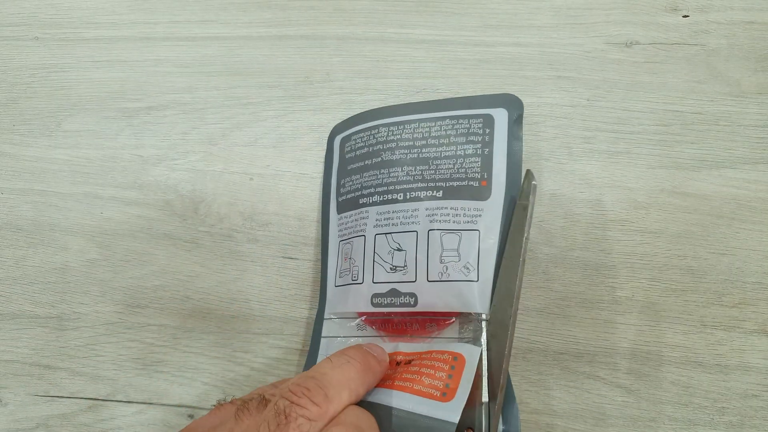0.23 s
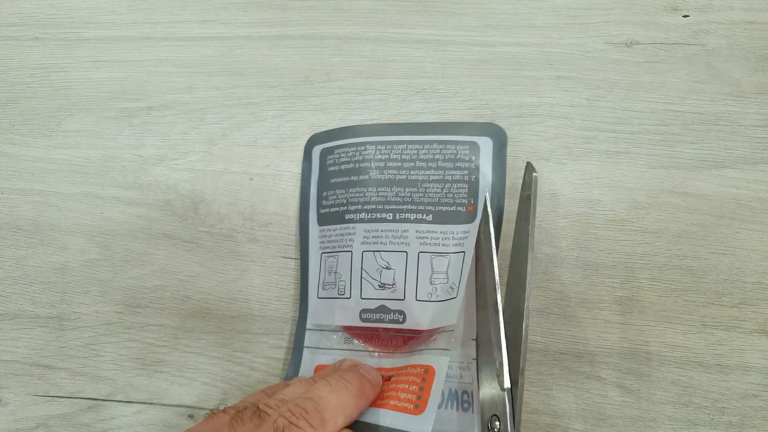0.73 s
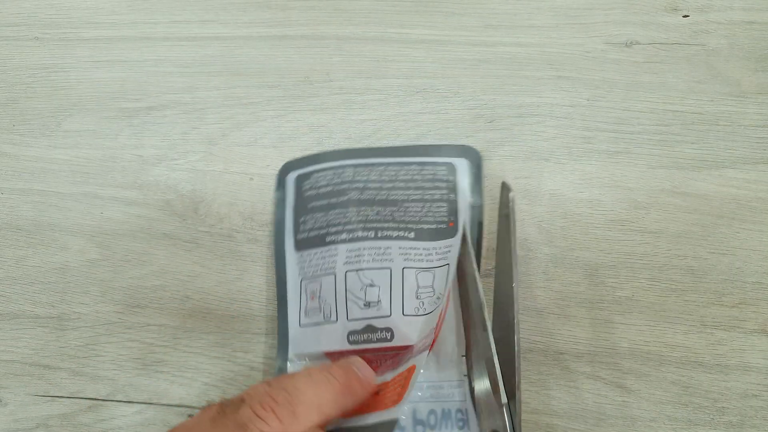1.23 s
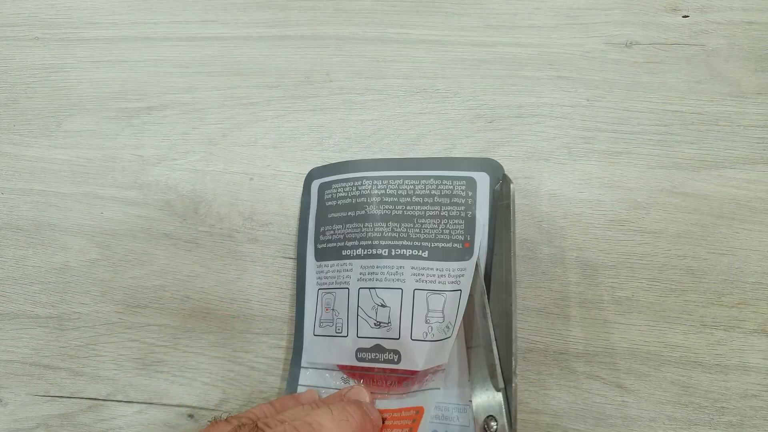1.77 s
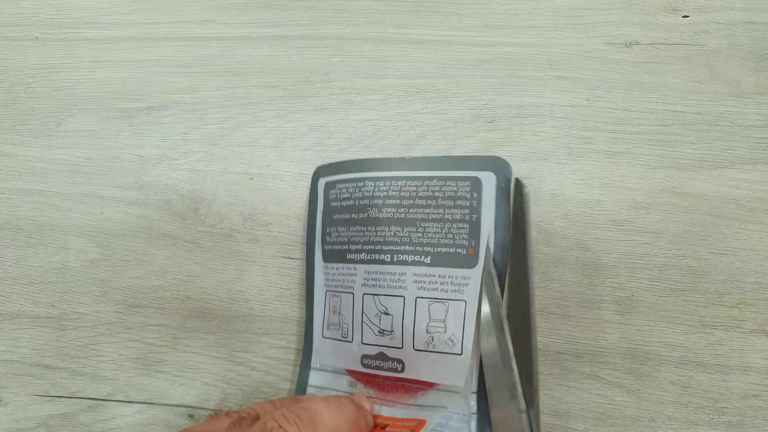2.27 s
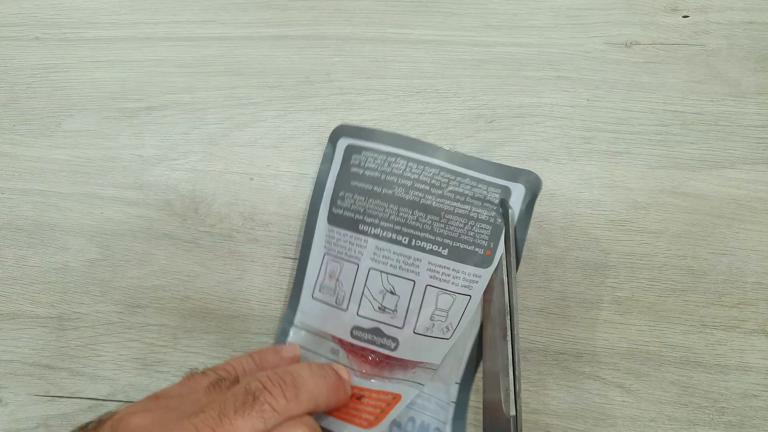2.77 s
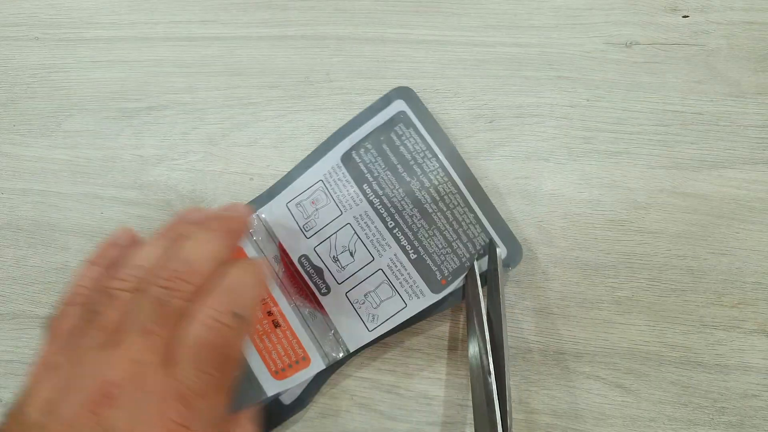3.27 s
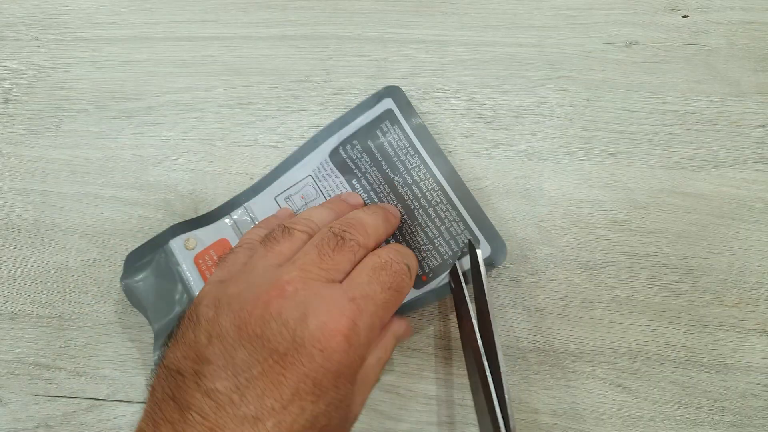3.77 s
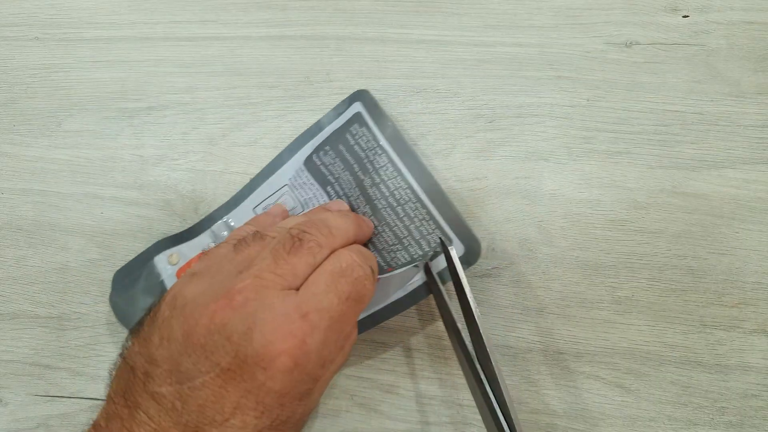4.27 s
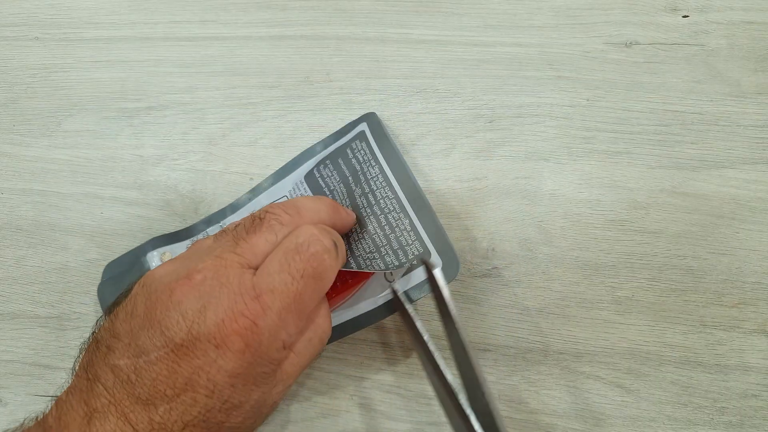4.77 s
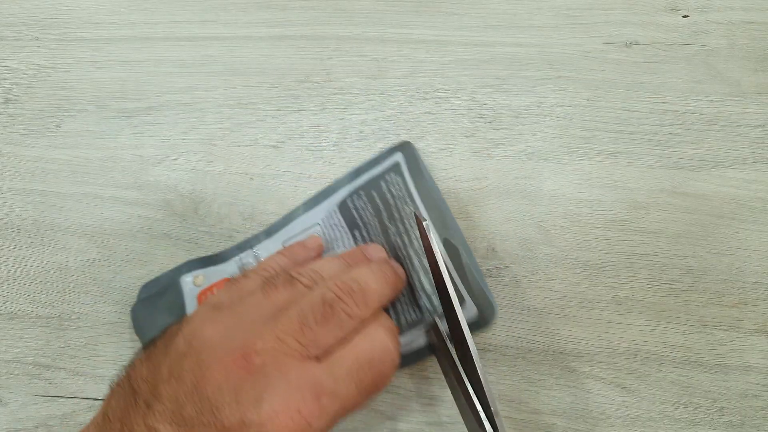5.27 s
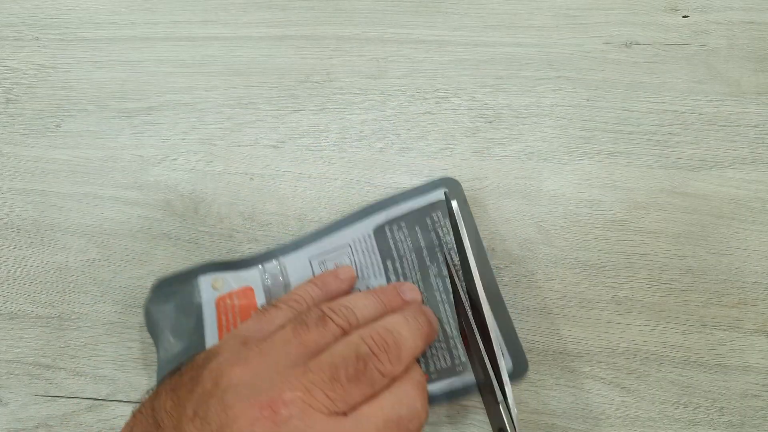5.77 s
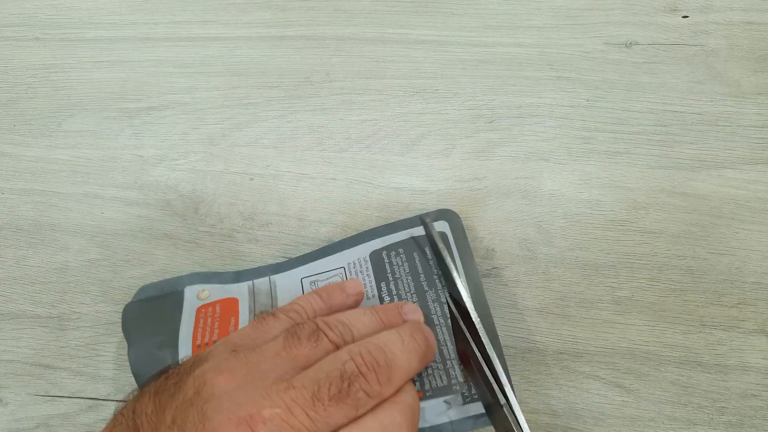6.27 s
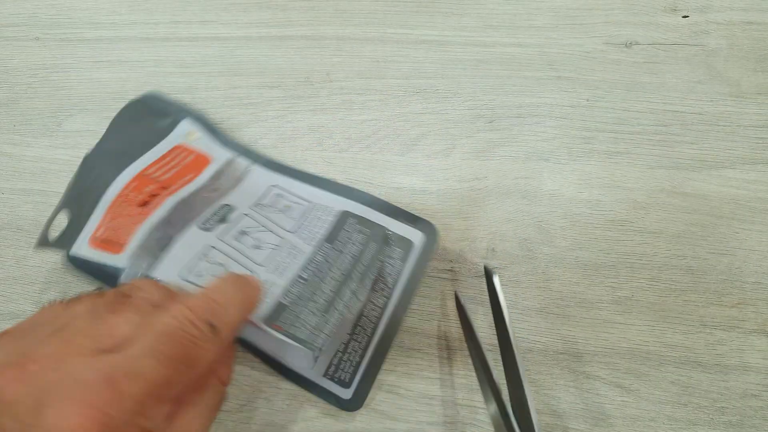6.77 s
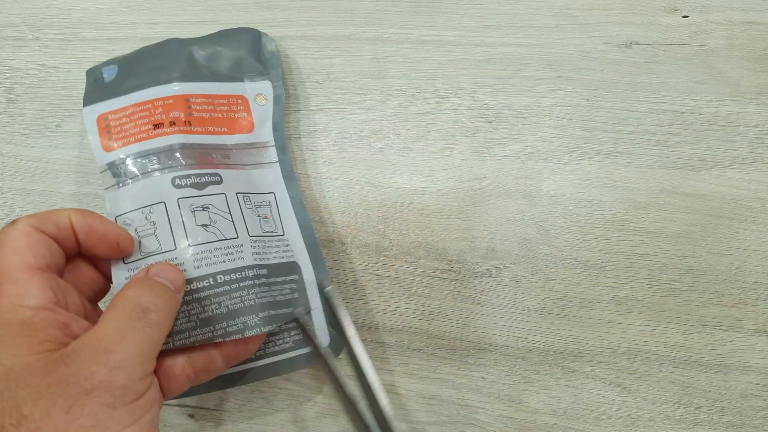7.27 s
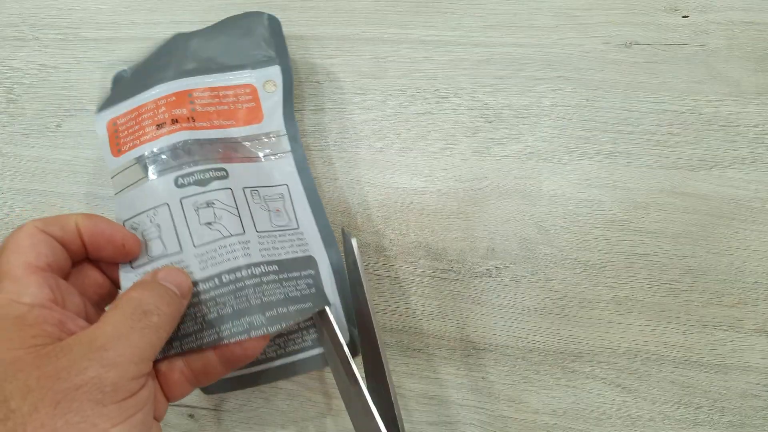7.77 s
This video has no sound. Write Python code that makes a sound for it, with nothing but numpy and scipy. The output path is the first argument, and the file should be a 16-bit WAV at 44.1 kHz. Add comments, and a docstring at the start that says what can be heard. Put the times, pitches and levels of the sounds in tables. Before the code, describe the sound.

Heard close in a small quiet room with soft air and a barely audible mains hum. From the start, a tight burst of bright plastic snaps and blade clicks, with rustling film. Around 0.4-0.8 s a crunchy cut swells, with more pops; scattered snaps follow at 1.0-2.4 s, including a brief hollow ring at 1.5. A strong crackling cluster comes at 2.6-2.8. At 3.2 a hard clack on the wooden table, another at 3.7, then softer sliding and faint bumps until about 5. Sharp snaps and a hollow ring at 5.2-5.3; quick rasping bites near 5.7, and knocks around 6. Crinkling and a bright snap at 6.4, a short crunch at 6.5, and immediately the loudest table knock. A tiny thin squeak at 6.8, several woody bumps to 7.1, then rubbing, a knock near 7.75 and renewed crinkling to the end.

```python
"""In a small room, just above a wooden table, scissors snip through a stiff plastic pouch.
Dense runs of tiny clicks make the crunch of the blades; short bursts of ringing noise make the film's snaps.
Pouch and scissors knock on the table: a noise burst for the clack, fading sine tones for the wood.
Filtered random clicks make hand, pouch and blades slide and rub; short tones add hollow rings, a thud, a squeak.
Quiet noise and two sine tones make the room air and a faint mains hum underneath."""
import sys
import numpy as np
from scipy import signal
from scipy.fft import rfft, irfft, next_fast_len
from scipy.io import wavfile
from scipy.ndimage import map_coordinates

SR = 44100
rng = np.random.default_rng(int(sys.argv[2]) if len(sys.argv) > 2 else 0)


def unload_audio(sound):
    """Save the sound as a 16-bit wav file, at the path given as the first command line argument."""
    columns = np.transpose(np.atleast_2d(sound))
    # keep every value between -1 and 1, then stretch to whole-number steps
    steps = np.round(np.clip(columns, -1, 1) * 32767)
    wavfile.write(sys.argv[1], SR, steps.astype(np.int16))


N = 353666  # length of the scene in samples


def amp(db):
    """Turn decibels into a gain."""
    return 10 ** (np.asarray(db) / 20)


def unit(x):
    """Scale to an average (rms) level of 1."""
    return x / np.sqrt(np.mean(x ** 2) + 1e-20)


def along(points, hz):
    """Read a curve of (frequency, value) points on a log frequency axis."""
    point_hz, value = np.transpose(points)
    return np.interp(np.log(hz + 1), np.log(point_hz), value)


def wobble(rate):
    """A smooth random curve through `rate` random values a second."""
    values = rng.standard_normal(int(N * rate / SR) + 4)
    return map_coordinates(values, [np.arange(N) * rate / SR])


def fade(t, t60):
    """A decay of 60 dB in t60 seconds."""
    return np.exp(-np.log(1000) * t / t60)


def filtered(x, response):
    """Multiply the spectrum of x by a response that depends on frequency."""
    length = x.shape[-1]
    padded = next_fast_len(length + SR // 10)
    spectrum = rfft(x, padded) * response(np.fft.rfftfreq(padded, 1 / SR))
    return irfft(spectrum, padded)[..., :length]


def coloured(x, tone):
    """Shape x with the given tone curve, then scale to rms 1."""
    return unit(filtered(x, lambda hz: amp(along(tone, hz))))


def causal(gain):
    """The minimum-phase spectrum with this gain: its energy comes as early as it can."""
    cepstrum = irfft(np.log(np.maximum(gain, 1e-6)))
    half = len(cepstrum) // 2
    cepstrum[1:half] *= 2
    cepstrum[half + 1:] = 0
    return np.exp(rfft(cepstrum))


def add(track, s, sound):
    """Mix a sound into a track at time s."""
    start = max(round(s * SR), 0)
    part = track[..., start:start + sound.shape[-1]]
    part += sound[..., :part.shape[-1]]


def grains(per_s, spread_db):
    """Tiny slips: single-sample clicks at random times, of very unequal size and either sign."""
    size = amp(spread_db * np.minimum(rng.standard_normal(N), 2))
    happens = rng.random(N) < per_s / SR
    return unit(happens * size * rng.choice([-1, 1], N))


def diffuse(pair, spacing_m=0.072, alike=0.61):
    """Two unrelated signals as sound from all sides: the two ports are most alike in the bass."""
    def mid_and_side(hz):
        turn = np.arccos(alike * np.sinc(2 * hz * spacing_m / 343)) / 2  # 343 m/s: speed of sound
        return np.array([np.cos(turn), np.sin(turn)])
    mid, side = filtered(pair, mid_and_side)
    return np.array([mid + side, mid - side])


def direct(x, lead_s):
    """The straight path reaches the left port lead_s sooner than the right."""
    return filtered(x, lambda hz: np.exp(1j * np.pi * hz * lead_s * np.array([[1], [-1]])))


# how long the room's echoes last at each pitch: (frequency [Hz], time to die by 60 dB [s])
ROOM_DECAY = [(120, 0.49), (400, 0.14), (1500, 0.15), (5000, 0.14), (14000, 0.13)]


def heard(x, room_db, lead_s, build_s=0.001, early=1.9, early_t60=0.039):
    """The straight path plus a fresh random scatter of echoes from table and walls."""
    hz, t, bands = signal.stft(rng.standard_normal((2, SR // 3)), SR, nperseg=256)
    bands = bands * fade(t, along(ROOM_DECAY, hz)[:, None])
    tail = signal.istft(bands, SR, nperseg=256)[1]
    t = np.arange(tail.shape[1]) / SR
    # table and hands are near, so their echoes come first and strongest
    tail = diffuse(tail) * (1 - np.exp(-t / build_s)) * (1 + early * fade(t, early_t60))
    tail = tail / np.linalg.norm(tail[0])
    echoes = signal.fftconvolve(np.atleast_2d(x), tail, axes=1)[:, :x.shape[-1]]
    return direct(x, lead_s) + amp(room_db) * echoes


def moving(x, room_db, lead_s):
    """A source that moves about meets a new pattern of echoes eight times a second."""
    out, step = np.zeros((2, N)), SR // 8
    for start in range(0, N, step):
        # silence after each piece leaves room for its echoes
        part = np.pad(x[start:start + step], (0, step))
        if np.abs(part).max() > 1e-6:  # skip silent pieces
            add(out, start / SR, heard(part, room_db, lead_s))
    return out


def body(hz):
    """The low band, about 90-680 Hz, that a heavier contact fills."""
    return 1 / (1 + (hz / 680) ** 4) / (1 + (90 / hz) ** 4)


def blow(tone, body_db, treble_db, ring_hz, t60, ring_db, octaves, breadth, size=16384):
    """A brief flutter of the film, ringing round one pitch: a noise burst, different at each port."""
    t, hz = np.arange(size) / SR, np.fft.rfftfreq(size, 1 / SR) + 1
    # a broad sheet does not send quite the same wave to both ports
    shake = rng.standard_normal(size) + breadth * diffuse(rng.standard_normal((2, size)))
    # the flutter, with a much shorter crack on its start
    shake *= fade(t, t60) + 0.092 * fade(t, 0.0026)
    ring = ring_db * np.exp(-.5 * (np.log2(hz / ring_hz) / octaves) ** 2)
    shelves = body_db * body(hz) + treble_db / (1 + (4700 / hz) ** 4)
    # so small a sheet radiates no deep bass
    radiation = 1 / (1 + (90 / hz) ** 3)
    spectrum = rfft(shake) * causal(radiation * amp(along(tone, hz) + ring + shelves))
    # set the level by the middle band: its energy equals rms 1 over 10 ms
    middle = irfft(spectrum * ((hz > 700) & (hz < 4500)))
    return irfft(spectrum) * np.sqrt(2 * SR / 100) / np.linalg.norm(middle)


def stroke(length, attack, release):
    """One movement: its progress from 0 to 1, and a gain that rises, holds and dies away."""
    t = np.arange(SR) / SR
    progress = np.clip(t / length, 0, 1)
    gain = np.clip(t / attack, 0, 1) * fade(np.maximum(t - length, 0), release)
    return progress, gain


# the tones of the mains hum: (frequency [Hz], level [dB])
HUM_TONES = [(58.6, -58.5), (118, -75)]
# tone of the room air: (frequency [Hz], level per Hz [dB])
AIR_TONE = [(20, -13), (55, 4), (100, 6), (200, -5), (2000, -14.5), (6000, -28), (16000, -40)]


def background(air_db=-69):
    """Still room air as soft noise from all sides, and sine tones for a slightly unsteady hum."""
    t = np.arange(N) / SR
    hum = np.zeros(N)
    for hz, db in HUM_TONES:
        hum += amp(db) * unit(np.sin(2 * np.pi * hz * t + 0.66 * wobble(3.1)))
    air = coloured(diffuse(rng.standard_normal((2, N))), AIR_TONE)
    return hum * amp(0.41 * wobble(3)) + amp(air_db) * air


# hand, pouch and scissor blades slide and rub: (time [s], length [s], drag on the table [dB],
# film rustle [dB], skin and blade hiss [dB])
RUBS = [(0.0, 0.19, -57, -61, -72), (0.278, 0.17, -66, -68.5, -89), (0.41, 0.37, -53.5, -55, -60.5),
        (0.882, 0.45, -76, -59.5, -65), (1.095, 0.037, -73, -53, -48), (1.223, 0.33, -89, -82, -83),
        (1.308, 0.15, -71.5, -59.5, -64), (1.508, 0.06, -65, -53, -68), (1.623, 0.16, -73, -59, -66),
        (1.994, 0.22, -72, -61, -69.5), (2.071, 0.034, -48.5, -43, -61.5), (2.314, 0.078, -73, -61, -74),
        (2.493, 0.05, -57.5, -75, -93.5), (2.565, 0.1, -47.5, -39, -59.5), (2.705, 0.11, -55, -48, -65),
        (2.912, 0.4, -66, -56, -65.5), (3.197, 0.27, -58, -59.5, -71.5), (3.614, 0.094, -57, -58.5, -72.5),
        (3.699, 0.27, -56.5, -56, -58.5), (4.01, 0.49, -61, -65.5, -66), (4.46, 0.25, -64, -66.5, -73),
        (4.732, 0.19, -62.5, -64, -74), (5.016, 0.078, -69, -66, -66), (5.125, 0.098, -61, -57, -57.5),
        (5.226, 0.25, -62.5, -53, -52), (5.562, 0.16, -69, -68, -66.5), (5.678, 0.095, -43, -47, -56),
        (5.814, 0.22, -46, -51, -61.5), (6.207, 0.2, -61, -65, -72), (6.381, 0.22, -50.5, -45.5, -62.5),
        (6.665, 0.31, -54.5, -54, -52), (6.97, 0.33, -56.5, -58, -66), (7.381, 0.14, -59, -57.5, -60.5),
        (7.709, 0.21, -63.5, -54.5, -59), (7.887, 0.23, -56.5, -48.5, -54.5)]
RUB_ATTACK_S, RUB_RELEASE_S = 0.025, 0.21  # rise time, and time to die by 60 dB
RUB_ARCH_DB = 6  # the movement is slower, so this much quieter, at both ends of a rub
# after every snap or knock the film crinkles on as it settles:
# levels relative to the jolt, and time to die by 60 dB
SETTLE_DRAG_DB, SETTLE_RUSTLE_DB, SETTLE_HISS_DB, SETTLE_S = -29.5, -20, -31, 0.21


def friction():
    """Strength of drag, rustle and hiss: the rubs, plus the film settling after each jolt."""
    power = np.zeros((3, N))
    for start, length, drag_db, rustle_db, hiss_db in RUBS:
        progress, gain = stroke(length, RUB_ATTACK_S, RUB_RELEASE_S)
        speed = gain * amp(-RUB_ARCH_DB * (2 * progress - 1) ** 2)
        add(power, start, (speed * amp([[drag_db], [rustle_db], [hiss_db]])) ** 2)
    settle = amp([[SETTLE_DRAG_DB], [SETTLE_RUSTLE_DB], [SETTLE_HISS_DB]])
    settle = settle * fade(np.arange(SR // 2) / SR, SETTLE_S)
    for s, db, *_ in FILM_SNAPS + TABLE_KNOCKS:
        add(power, s, (amp(db) * settle) ** 2)
    return np.sqrt(power)


# tone of the pouch dragging on the wood: (frequency [Hz], level per Hz [dB])
DRAG_TONE = [(50, 2.5), (120, -2), (190, -9.5), (300, -9.5), (410, 1.5), (600, -7), (1200, -24.5),
             (4000, -76)]
# tone of the crackling creases: (frequency [Hz], level per Hz [dB])
RUSTLE_TONE = [(200, -41.5), (560, -8), (740, 2), (920, -1.5), (1300, -0.5), (2300, 2), (3600, -3.5),
               (5500, -13), (8000, -28), (16000, -25.5)]
# tone of skin and steel hissing: (frequency [Hz], level per Hz [dB])
HISS_TONE = [(1500, -15), (3500, 10), (6500, 2.5), (8000, -3.5), (12000, -2.5), (16000, -21)]


def rubbing():
    """The pouch drags on the wood, its creases crackle, and skin and steel hiss as they slide."""
    dragging, rustling, hissing = friction() * amp(2.94 * wobble(35))
    # creases give way in small clumps
    clumps = unit(amp(3.5 * wobble(120)))
    drag = dragging * coloured(grains(per_s=2300, spread_db=5.5), DRAG_TONE)
    rustle = rustling * coloured(grains(per_s=700, spread_db=4), RUSTLE_TONE)
    hiss = hissing * coloured(grains(per_s=9600, spread_db=4.0), HISS_TONE)
    return moving(drag + clumps * rustle + hiss, room_db=0.5, lead_s=.00004)


# the film buckles or the blades click: (time [s], level [dB], body [dB], treble [dB],
# ring pitch [Hz], flutter time to die by 60 dB [s])
FILM_SNAPS = [(0.037, -36.5, 17, -14, 1260, 0.019), (0.0791, -26, -13, 0, 2440, 0.02),
              (0.0849, -22, -11, 5, 2300, 0.01), (0.0975, -27.5, 16.5, 4, 2120, 0.068),
              (0.123, -27.5, 6, 3.5, 2170, 0.013), (0.3205, -39, 15, -39, 1410, 0.029),
              (0.382, -49, 25, -42, 830, 0.1), (0.4607, -32, 7.5, -24, 1500, 0.021),
              (0.5531, -27, 8, 11.5, 1900, 0.029), (0.5825, -23.5, -9, 2, 2200, 0.024),
              (0.6098, -32, -15, 0, 2150, 0.035), (0.6532, -31, 10, -29, 1160, 0.018),
              (0.6779, -33, 16, -29.5, 1410, 0.12), (0.6949, -26.5, 15.5, 7, 1580, 0.077),
              (0.7361, -34.5, 10, -21.5, 1720, 0.023), (0.753, -35, 7, -13, 1430, 0.014),
              (0.82, -28, 13, -2, 2140, 0.013), (0.9987, -30, -7, -21, 1470, 0.031),
              (1.1021, -25, 1.5, 0, 2450, 0.03), (1.3463, -35, -8, 10.5, 2470, 0.012),
              (1.413, -43, 18.5, -17, 1430, 0.1), (1.4374, -44.5, 10, -22, 1380, .015),
              (1.5356, -39, 6, -9, 850, 0.043), (1.575, -31, 6, -20.5, 1340, 0.014),
              (1.8396, -54.5, 16, -11, 1440, 0.0091), (2.0763, -32, 17, -5.5, 2520, 0.077),
              (2.1396, -26, 4, -4.5, 2350, 0.0018), (2.397, -33.5, 8.5, -35, 980, 0.037),
              (2.6063, -19, 12, 9.5, 2020, 0.028), (2.6841, -39.5, 4, -28, 1980, .018),
              (2.7196, -35, 13, 2, 2100, 0.025), (2.7438, -45, 17, 16.5, 2710, 0.02),
              (2.77, -32, 16, 11, 1990, 0.067), (2.8029, -29, 11, 6, 1710, .019),
              (2.8223, -19, -20, 7, 2070, 0.0024), (3.017, -42.5, 10, -8, 1420, .044),
              (3.073, -28.5, -4, -14, 1640, 0.00093), (3.1106, -35.5, 13.5, 0.5, 2190, 0.0017),
              (3.1737, -38, 24, 15.5, 1640, 0.059), (3.423, -49, -18, 3.5, 2060, 0.0098),
              (3.6681, -39.5, 21, -35, 1780, 0.019), (3.753, -34.5, 4, -10, 1750, 0.011),
              (3.7662, -31.5, 19.5, -14, 2210, 0.014), (3.86, -29, -15, -10, 2160, 0.025),
              (4.5009, -44.5, 16, -9.5, 1650, 0.011), (4.5506, -45, 12, -34, 1230, .025),
              (4.8418, -34.5, 17, 10.5, 2060, 0.052), (5.2526, -25.5, -4, 0, 2840, 0.024),
              (5.2865, -22.5, -1, -15, 1950, 0.0068), (5.3703, -37.5, -30, 11, 3640, 0.09),
              (5.6209, -32.5, 15, 9.5, 2900, 0.043), (5.883, -29, 20.5, 0, 2030, 0.028),
              (5.886, -27, -4, -11, 1960, 0.061), (6.3572, -38, 9, -12, 2360, 0.029),
              (6.3976, -22, 1.5, 11, 3080, 0.057), (6.5979, -38, 8, -3.5, 2020, 0.021),
              (7.3043, -42, 12, -39, 1375, 0.028), (7.4587, -35, 9, -8.5, 1200, 0.0093),
              (7.5235, -48, 18, 10, 1480, .029), (7.9989, -32.5, -5, -27, 1170, .008)]
# basic tone of a snap: (frequency [Hz], level per Hz [dB])
SNAP_COLOUR = [(40, -27.5), (110, -21), (350, -17.5), (560, -6.5), (740, -1.5), (900, -1.5), (1250, 1),
               (2200, -1), (3600, -1), (5500, -6), (8000, -20), (12000, -22), (16000, -39)]


def snaps():
    """Each buckle of the film or click of the blades has its own size, pitch and length."""
    out = np.zeros((2, N))
    for s, db, body_db, treble_db, ring_hz, t60 in FILM_SNAPS:
        snap = blow(SNAP_COLOUR, body_db, treble_db, ring_hz, t60, ring_db=7.5, octaves=0.59, breadth=0.76)
        add(out, s, amp(db) * heard(snap, room_db=-4, lead_s=0.00011))
    return out


# the blades bite through the film: (time [s], length [s], level at the end [dB],
# swell [dB], treble boost at the start [dB])
BLADE_BITES = [(0.413, 0.19, -31, 25, 12), (5.677, 0.026, -36, 10.5, 20), (5.703, 0.021, -24, 9, 11.5),
               (5.735, 0.027, -26.5, 12, 9), (6.457, 0.013, -43, 3, 17.5), (6.488, 0.021, -25.5, 12, 18)]
# tone of the crunch: (frequency [Hz], level per Hz [dB])
CRUNCH_TONE = [(40, -40), (110, -2.5), (250, -1), (700, 4), (1250, 3.5), (1750, 3.5), (2200, 8),
               (2800, 5.5), (3600, 2), (5500, -8.5), (9000, -19), (13000, -16.5), (16000, -31.5)]
# a bite starts, swells quickly at first, and turns from hiss to crunch as the blades close
CUT_ATTACK_S, CUT_RELEASE_S, SWELL_POWER, CUT_DULLING_DB = 0.0027, 0.02, 1.94, 12


def cutting(split_hz=4700):
    """The film gives way between the blades in a dense run of tiny fractures, louder and duller as they close."""
    fractures = grains(per_s=1500, spread_db=8.0) * amp(0.99 * wobble(160))
    crunch = coloured(fractures, CRUNCH_TONE)
    bright = filtered(crunch, lambda hz: hz ** 4 / (hz ** 4 + split_hz ** 4))
    gains = np.zeros((2, N))  # one for the dull part, one for the bright part
    for start, length, db, swell_db, treble_db in BLADE_BITES:
        closed, gain = stroke(length, CUT_ATTACK_S, CUT_RELEASE_S)
        force = gain * amp(db - swell_db * (1 - closed) ** SWELL_POWER)
        bright_force = force * amp(treble_db - CUT_DULLING_DB * closed)
        add(gains, start, np.array([force, bright_force]))
    return moving(gains[0] * (crunch - bright) + gains[1] * bright, room_db=1.0, lead_s=0.00012)


# short pitched sounds, hollow rings of pouch and table, a soft low thud, a thin squeak:
# (time [s], length [s], start pitch [Hz], end pitch [Hz], level [dB])
SHORT_TONES = [(1.515, 0.036, 741, 755, -37.5), (3.461, 0.1, 420, 405, -49), (4.744, 0.075, 123, 139, -51),
               (4.767, 0.18, 242, 225.6, -54.5), (5.174, 0.039, 409, 420, -34),
               (6.807, 0.084, 4330, 4640, -48)]


def pitched_sounds(waver=0.023, overtone_db=-10, rough_db=4):
    """Hollow rings, a thud and a squeak: short gliding tones with one overtone, uneven in pitch and level."""
    out = np.zeros(N)
    unsteady = waver * wobble(240)
    for s, length, start_hz, end_hz, db in SHORT_TONES:
        progress = np.linspace(0, 1, round(length * SR))
        pitch = start_hz + (end_hz - start_hz) * progress
        pitch = pitch * (1 + unsteady[round(s * SR):][:len(progress)])
        phase = 2 * np.pi * np.cumsum(pitch) / SR
        tone = np.sin(phase) + amp(overtone_db) * np.sin(2 * phase)
        add(out, s, amp(db) * np.sin(np.pi * progress) * tone)
    roughness = unit(amp(rough_db * wobble(220)))
    return heard(out * roughness, room_db=-5, lead_s=0)


# scissors and pouch bump the table: (time [s], level [dB], body [dB], treble [dB])
TABLE_KNOCKS = [(3.201, -19, 1.5, 3), (3.4561, -48, 6, -19), (3.6977, -23, 1.5, -8), (3.7098, -30, -8, 4),
                (3.9219, -34.5, 2, -0.5), (4.056, -72, 23, 5), (4.161, -41.5, 0.5, -12),
                (4.319, -56, 6.5, -8), (4.369, -41.5, 3, -5), (4.6444, -55, 12, -5),
                (5.1782, -38.5, -2, -13), (5.505, -46.5, 7, -17), (5.8314, -49.5, 14, 5),
                (5.951, -26.5, 0, 2.5), (6.009, -52, 2, -20), (6.0503, -38.5, -3.5, -13),
                (6.1827, -43, 1.5, -7), (6.213, -30, 0.5, -3), (6.5288, -15, 0, -2), (6.809, -29.5, 4, -16),
                (6.9096, -31.5, 3.5, -7), (6.9513, -45, 18, -1), (7.0625, -31, -1.5, -8.5),
                (7.087, -37, 5.5, -8), (7.1595, -54, 22.5, 1), (7.3646, -46, -3, -21),
                (7.7118, -48, 3.5, -11), (7.7574, -28.5, -0.5, -14), (7.8791, -43.5, 3.5, -11)]
# basic tone of the clack: (frequency [Hz], level per Hz [dB])
CLACK_TONE = [(40, 9), (120, -11.5), (220, -4.5), (400, -1.5), (800, 1), (1500, -6.5), (2800, 3.5),
              (4500, -6), (8000, -17), (12000, -30), (16000, -56)]
# the pitches at which the table top rings: (frequency [Hz], level [dB], time to die by 60 dB [s])
TABLE_MODES = [(116.4, -12, 0.49), (254.2, -2.5, 0.16), (338.8, -3.5, 0.19), (374, -10, 0.38),
               (400.3, 9.5, 0.11), (424, -7, 0.42), (434, -15.5, 0.21), (537, -3.5, 0.23), (574, 5, 0.095),
               (694, 3, 0.084), (817, -4.5, 0.14), (934, -0.5, 0.12), (947, -8.5, 0.24), (1198, -1.5, 0.12),
               (1308, 2.5, 0.13), (1660, -5, 0.061), (2420, 0.5, 0.035)]


def knocks(table_db=-8, attack_s=0.0016, skew=0.12, scatter_db=3):
    """A clack on the table, whose top rings on in fading sine tones at new strengths each time."""
    out = np.zeros((2, N))
    hz, mode_db, t60 = np.transpose(TABLE_MODES)[:, :, None]
    for s, db, body_db, treble_db in TABLE_KNOCKS:
        clack = blow(CLACK_TONE, body_db, treble_db, ring_hz=1370, t60=0.045,
                     ring_db=12.0, octaves=0.44, breadth=1.0)
        t = np.arange(clack.shape[1]) / SR
        # a soft, heavy contact favours the low modes
        strength = amp(mode_db + body_db * body(hz) + scatter_db * rng.standard_normal(hz.shape))
        # the wide top reaches each port at a slightly different phase (in turns)
        phase = rng.random(hz.shape) + skew * rng.standard_normal((2, *hz.shape))
        modes = strength * fade(t, t60) * np.sin(2 * np.pi * (hz * t + phase))
        wood = modes.sum(axis=1) * amp(table_db) * (1 - np.exp(-t / attack_s))
        add(out, s, amp(db) * (heard(clack, room_db=-3, lead_s=.00007) + wood))
    return out


def scene():
    """All sources together at the two microphone ports."""
    return background() + rubbing() + snaps() + cutting() + pitched_sounds() + knocks()


# how much more the left port hears than the right: (frequency [Hz], level difference [dB])
PORT_BALANCE = [(60, -2.5), (120, -8.5), (250, -1.5), (600, -0.5), (2400, -1), (4400, -1), (8100, 7.5),
                (11000, 2), (15000, -7)]
BOTTOM_HZ, TOP_HZ = 42, 16000  # edges of the microphone's band


def record(dry):
    """Each port has its own colour; the bass rolls off gently and the top is cut off steeply."""
    # half of the difference goes to each port
    ports = filtered(dry, lambda hz: amp(along(PORT_BALANCE, hz) * np.array([[.5], [-.5]])))
    ports = filtered(ports, lambda hz: hz ** 3 / (hz ** 3 + BOTTOM_HZ ** 3))
    return filtered(np.clip(ports, -1, 1), lambda hz: 1 / np.sqrt(1 + (hz / TOP_HZ) ** 160))


dry = scene()
out = record(dry)
unload_audio(out)
```